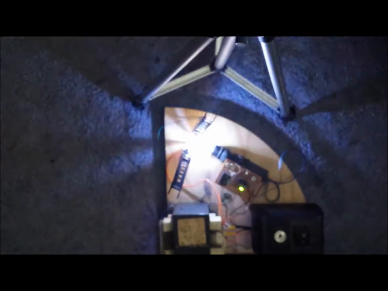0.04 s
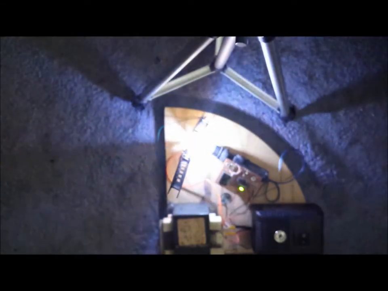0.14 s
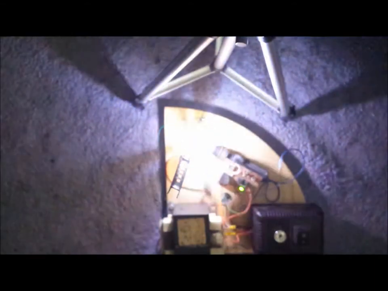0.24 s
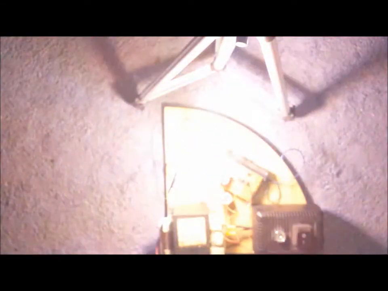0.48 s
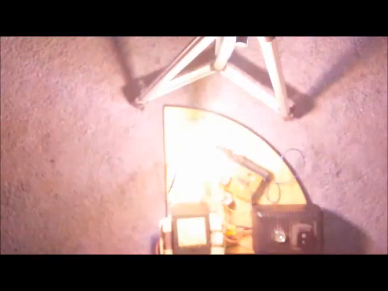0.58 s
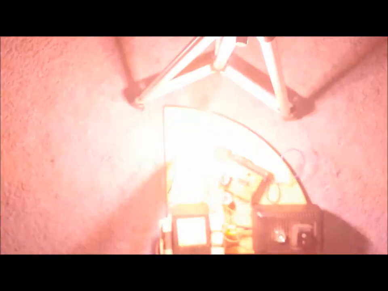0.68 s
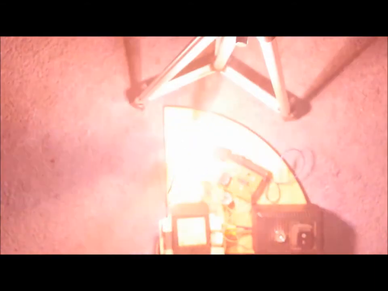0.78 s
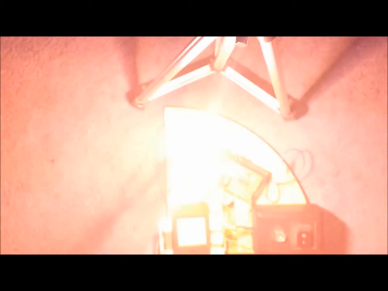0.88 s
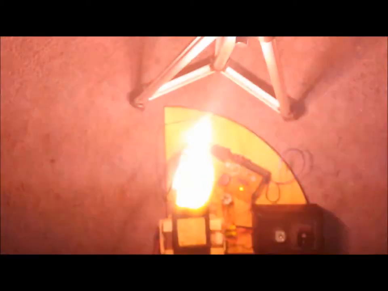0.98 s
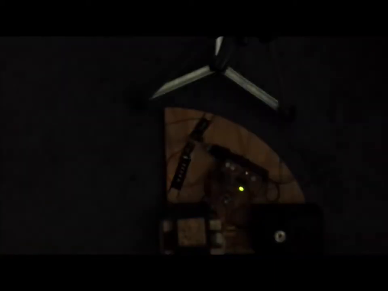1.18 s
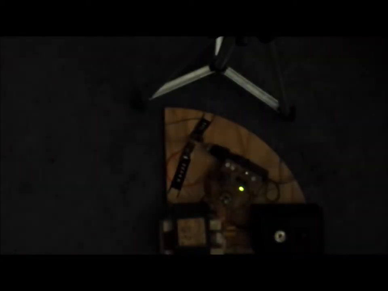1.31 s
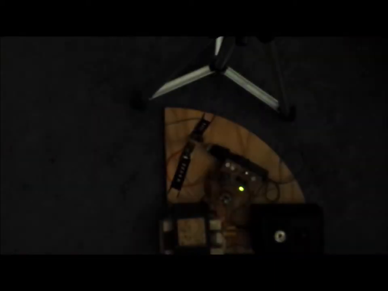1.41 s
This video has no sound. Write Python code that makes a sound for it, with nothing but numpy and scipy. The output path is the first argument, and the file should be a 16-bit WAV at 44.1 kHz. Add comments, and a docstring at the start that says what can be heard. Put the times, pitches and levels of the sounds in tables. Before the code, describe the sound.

Spitting electric arc buzz with sharp snaps grows into a deep hum, then suddenly stops.

```python
"""Electric arc in a small room

A transformer feeds an arc on the floor, restriking 100 times a second. A thin spitting buzz
flares with sharp snaps, then swells into a flame with a deep hum.
It goes out at once and leaves the faint hum of the transformer."""
import sys
import numpy as np
from scipy import signal
from scipy.fft import rfft, irfft
from scipy.io import wavfile

SR = 44100
rng = np.random.default_rng(int(sys.argv[2]) if len(sys.argv) > 2 else 0)


def to_wav(sig):
    """Store sig (one row per channel, or 1-D mono) as 16-bit WAV at the path in sys.argv[1].

    Samples outside -1..1 are clipped; the rate is SR.
    """
    pcm = np.clip(np.atleast_2d(sig), -1, 1) * 32767
    pcm = np.round(pcm).astype(np.int16)
    wavfile.write(sys.argv[1], SR, pcm.T)  # frames by channels


N = 63945
T = np.arange(N) / SR
BUZZ_HZ, FLARE_S, OUT_S = 100, .364, 1.0894
SPARK_OFFSET_S, FLAME_OFFSET_S, SPARK_WIDTH_S = .0075, .0095, .000182
HUM_FALL_DB_PER_S = 391


def amp(db):
    """Decibels to gain."""
    return 10 ** (np.asarray(db) / 20)

def unit_rms(x):
    """Scale to rms 1."""
    return x / np.sqrt(np.mean(x ** 2) + 1e-20)

def curve(table, t=T, column=1):
    """Table column, interpolated in time."""
    rows = np.array(table)
    return np.interp(t, rows[:, 0], rows[:, column])

def spectrum(table, hz):
    """Table interpolated in log frequency."""
    freq_hz, value = np.transpose(table)
    return np.interp(np.log(hz + 1), np.log(freq_hz + 1), value)

def colour(x, tone):
    """Filter by a spectrum in dB."""
    gain = amp(spectrum(tone, np.fft.rfftfreq(2 * N, 1 / SR)))
    return irfft(rfft(x, 2 * N) * gain)[..., :N]

# Left-right likeness: freq_hz, correlation
STEREO_CORRELATION = [(150, 0.91), (1500, 0.07), (4000, 0.24), (12000, 0.24)]

def noise(tone, grain_db=0):
    """Stereo noise, alike in the bass; grain makes it crackle."""
    white = rng.standard_normal((2, N))
    grain = amp(grain_db * np.minimum(rng.exponential(1, N), 6))
    left, other = rfft(white * grain)
    shared = spectrum(STEREO_CORRELATION, np.fft.rfftfreq(N, 1 / SR))
    right = shared * left + np.sqrt(1 - shared ** 2) * other
    return unit_rms(colour(irfft(np.array([left, right]), N), tone))

def drift(rate_hz):
    """Slow random wander, rms 1."""
    lowpass = np.exp(-(np.fft.rfftfreq(N, 1 / SR) / rate_hz) ** 2)
    return unit_rms(irfft(rfft(rng.standard_normal(N)) * lowpass, N))

def pulse(at_s, level_db, half_width_s, order=3):
    """Pressure pulse of one strike; higher order flattens the top."""
    return amp(level_db) * np.exp(-np.minimum(abs(T - at_s) / half_width_s, 10) ** order / 2)

def burst(start_s, level_db, decay_s, rise_s=.0003):
    """Envelope: linear rise, exponential decay."""
    return amp(level_db) * np.clip((T - start_s) / rise_s, 0, 1) * np.exp(-abs(T - start_s) / decay_s)

def ring_out(db_per_s):
    """Decay once the arc is out."""
    return amp(-db_per_s * np.maximum(T - OUT_S, 0))

def unrest(t):
    """Restlessness of the arc; drops as the flame settles."""
    return np.interp(t, (.68, .88), [1, .3])

def radiate(x, cutoff_hz):
    """A small source radiates little bass."""
    return signal.sosfilt(signal.butter(1, cutoff_hz, "high", fs=SR, output="sos"), x)


# Spark restrikes: time_s, level_db
SPARK_LEVEL = [(0, -30.5), (.12, -31), (.22, -28), (.33, -30), (.38, -29), (.68, -36), (.8, -44)]

def spark(jitter_s=.000015, scatter_db=1.1):
    """Thin buzz: a square, regular pulse each half cycle."""
    out = np.zeros(N)
    for at_s in np.arange(SPARK_OFFSET_S, OUT_S, 1 / BUZZ_HZ):
        late, size = rng.standard_normal(2)
        level_db = curve(SPARK_LEVEL, at_s) + scatter_db * size
        out += pulse(at_s + jitter_s * late, level_db, SPARK_WIDTH_S, order=6)
    return out

# Flame restrikes: time_s, level_db, half_width_s
FLAME_SHAPE = [(.36, -35, 0.00018), (.44, -22, 0.00018), (.5, -15.5, 0.00019), (.57, -33, 0.0012),
               (.66, -16, 0.00037), (.71, -24.5, 0.00017), (.77, -32.5, 0.00044), (.85, -26.5, 0.00023),
               (.98, -41, 0.00013), (1.08, -29, 0.00029)]
# Loud snaps: time_s, level_db, half_width_s
SNAP_PULSES = [(.3694, -7.5, .00005), (.3990, -14, .00012), (.4194, -11, .00009), (.4693, -20, .00011),
               (.5095, -15.5, .00016), (.5298, -9, .00015), (.5397, -15, .00015), (.5601, -9.5, .00019),
               (.5894, -17.5, .00011), (.6291, -14.5, .0002), (.6796, -20.5, .00014), (.7392, -17.5, .0002),
               (.8099, -22, .00021), (.8198, -25, .00019), (.9197, -23.5, .00019), (.9295, -22.5, .00021),
               (.9395, -23.5, .00019), (1.0003, -27.5, .00016)]

def flame(jitter_s=.00022, scatter_db=1.8):
    """Rounder, unsteady restrikes; a snap replaces the nearest one."""
    out = sum(pulse(*snap) for snap in SNAP_PULSES)
    for at_s in np.arange(FLAME_OFFSET_S, OUT_S, 1 / BUZZ_HZ):
        late, size = rng.standard_normal(2)
        snap_gap_s = min(abs(at_s - snap[0]) for snap in SNAP_PULSES)
        if at_s > FLARE_S and snap_gap_s > .5 / BUZZ_HZ:
            level_db = curve(FLAME_SHAPE, at_s) + scatter_db * size
            half_width_s = curve(FLAME_SHAPE, at_s, column=2)
            out += pulse(at_s + jitter_s * unrest(at_s) * late, level_db, half_width_s)
    return out

def electrode_ring(x, pitch_hz=2350, width_hz=500, until_s=.43):
    """The first snaps, on bare metal, ring the electrodes."""
    resonance = signal.iirpeak(pitch_hz, pitch_hz / width_hz, fs=SR)
    return x + .8 * signal.lfilter(*resonance, x * (T < until_s))

# Nearby surfaces: delay_s, left_gain, right_gain
REFLECTIONS = [(.00032, -0.22, -0.4), (.0015, .19, 0.23), (.0029, -0.42, 0.08), (.0062, 0.23, 0.25)]

def strikes():
    """Spark and flame pulses with their early reflections."""
    direct = radiate(spark(), cutoff_hz=805) - radiate(electrode_ring(flame()), cutoff_hz=607)
    return direct + sum(np.array([[left], [right]]) * np.interp(T - delay_s, T, direct, left=0)
                        for delay_s, left, right in REFLECTIONS)

# Flame hum: time_s, fundamental_db, overtones_db
HUM_LEVEL = [(0, -53, -60), (.2, -45, -66), (.35, -40.5, -57), (.48, -33, -37), (.56, -26.5, -31),
             (.66, -26.5, -31.5), (.77, -28.5, -36.5), (.92, -26, -34), (1, -24, -39.5), (1.06, -21.5, -33),
             (1.09, -22, -43)]
# Hum overtones: harmonic, gain_db
HUM_OVERTONES = [(2, -3), (3, -11), (4, -12), (5, -11.5), (6, -14), (7, -40)]
# Sinking resonance: time_s, centre_hz
HUM_RESONANCE = [(.8, 605), (.9, 551), (1, 503), (1.05, 410)]

def flame_hum(offset_s=.0083, left_lag_s=.000083, half_width_hz=61, waver_rad=.92):
    """The flame swells and collapses each half cycle; a resonance emerges as it settles."""
    phase = 2 * np.pi * BUZZ_HZ * (T - offset_s)
    lag = 2 * np.pi * BUZZ_HZ * left_lag_s * np.array([[.5], [-.5]])
    out = amp(curve(HUM_LEVEL)) * np.sin(phase) * np.ones((2, 1))
    for harmonic, gain_db in HUM_OVERTONES:
        detuning = (harmonic * BUZZ_HZ - curve(HUM_RESONANCE)) / half_width_hz
        lift_db = 18 * (1 - unrest(T)) / (1 + detuning ** 2)
        level_db = curve(HUM_LEVEL, column=2) + gain_db + lift_db + drift(5.1)
        waver = waver_rad * unrest(T) * drift(4.4)
        out += amp(level_db) * np.sin(harmonic * (phase - lag) + waver) * ring_out(db_per_s=456)
    return -np.sqrt(2) * out * ring_out(HUM_FALL_DB_PER_S)

def puffs(rise_s=.00064, decay_s=.0011, steady=.32, scatter_db=1.66):
    """Envelope: a puff after each strike, evening out as the flame settles."""
    offset_s = np.where(T < FLARE_S, SPARK_OFFSET_S, FLAME_OFFSET_S - SPARK_WIDTH_S)
    age_s = (T - offset_s) % (1 / BUZZ_HZ)
    shape = unit_rms(steady + np.minimum(age_s / rise_s, 1) * np.exp(-age_s / decay_s))
    uneven = shape * amp(scatter_db * drift(38))
    return (1 + unrest(T) * (uneven - 1)) * (T < OUT_S)

def sprays(gain_db=-23, loss_db_per_doubling=9):
    """Envelope of crackle thrown by snaps; wider snaps throw less."""
    out = np.zeros(N)
    for start_s, level_db, half_width_s in SNAP_PULSES:
        loss_db = loss_db_per_doubling * np.log2(half_width_s / .0001)
        out += burst(start_s, level_db + gain_db - loss_db, decay_s=.0016)
    return out

# Fine hiss: time_s, level_db
HISS_LEVEL = [(0, -45), (.1, -50), (.19, -47), (.24, -41.5), (.34, -59), (.4, -49), (.47, -46), (.59, -45),
              (.7, -48), (.78, -44), (.9, -49.5), (.99, -43.5), (1.085, -48.5)]
# Hiss spectrum: freq_hz, gain_db
HISS_SPECTRUM = [(100, 5.5), (500, 0.5), (1600, 5), (2650, -7), (3500, -2), (6000, -1.5), (8200, 1),
                 (11000, -1.5), (14500, -4.5)]
# Coarse crackle of the flaring electrodes: time_s, level_db
CRACKLE_LEVEL = [(.16, -49.5), (.3, -45), (.368, -46), (.382, -36), (.42, -35), (.46, -43), (.56, -45),
                 (.68, -45.5), (.78, -86)]
# Crackle spectrum: freq_hz, gain_db
CRACKLE_SPECTRUM = [(200, -37), (1000, -0.5), (2200, 2.5), (4000, 2.5), (7000, -2.5), (10000, -7),
                    (14500, -19)]

def sizzle(grain_db=1.5):
    """Hiss and crackle follow each strike; snaps add crackle."""
    puffing = puffs()
    hiss = amp(curve(HISS_LEVEL)) * puffing * noise(HISS_SPECTRUM, grain_db)
    crackle = (amp(curve(CRACKLE_LEVEL)) * puffing + sprays()) * noise(CRACKLE_SPECTRUM, grain_db)
    return hiss + crackle

# Arc spits: start_s, level_db, decay_s, centre_hz
SPIT_BURSTS = [(.1172, -25.5, .002, 4100), (.2215, -31.5, .007, 7800), (.3483, -29, .002, 2400),
               (.358, -25.5, .0025, 2500), (.659, -33, .004, 7500), (1.088, -44, .009, 5500)]

def spits(skirt_db=-12):
    """The arc spits short hisses, each around its own pitch."""
    out = np.zeros((2, N))
    for start_s, level_db, decay_s, hz in SPIT_BURSTS:
        band = [(hz / 4, 2 * skirt_db), (hz / 2, skirt_db), (hz, 0), (2 * hz, skirt_db)]
        out += burst(start_s, level_db, decay_s) * noise(band)
    return out

# Flame turbulence: time_s, level_db
ROAR_LEVEL = [(0, -66.5), (.33, -48), (.4, -42), (.5, -38), (.57, -34), (.63, -37.5), (.73, -36),
              (.78, -46), (1.05, -43.5), (1.085, -37.5)]
# Turbulence spectrum: freq_hz, gain_db
ROAR_SPECTRUM = [(25, -38), (70, -11), (150, -6), (350, 1.5), (750, 0.5), (1050, -10), (2500, -14),
                 (8000, -35)]

def roar():
    """Hot air churns, throbbing with the current."""
    throb = 1 + .64 * np.cos(2 * np.pi * BUZZ_HZ * T)
    return amp(curve(ROAR_LEVEL)) * throb * (T < OUT_S) * noise(ROAR_SPECTRUM)

def mains_tones(table):
    """Mains harmonics, each wavering slightly in level."""
    return np.sqrt(2) * sum(amp(level_db + drift(.75)) * np.cos(2 * np.pi * hz * (T - SPARK_OFFSET_S))
                            for hz, level_db in table)

# Idle core: pitch_hz, level_db
IDLE_TONES = [(100, -63), (200, -66), (500, -65), (600, -76), (700, -70), (800, -71.5), (900, -82),
              (1400, -80.5)]
# Loaded core: pitch_hz, level_db
LOAD_TONES = [(500, -54.5), (700, -59), (800, -58), (900, -61.5)]
# Load on the core: time_s, gain_db
LOAD_GAIN = [(0, -10), (.15, -8), (.3, 9.5), (.45, 1), (.7, -23)]

def transformer():
    """The core hums throughout and rings louder under load."""
    idle = mains_tones(IDLE_TONES)
    loaded = mains_tones(LOAD_TONES) * amp(curve(LOAD_GAIN))
    return idle + loaded * ring_out(HUM_FALL_DB_PER_S)

# Room decay: freq_hz, t60_s
ROOM_DECAY = [(1500, 0.33), (14000, 0.28)]

def room(x):
    """Short diffuse tail; treble dies sooner."""
    hz, t, bands = signal.stft(noise([(60, -6), (300, 1), (900, 0)]), SR, nperseg=256)
    decay = amp(-60 * t / spectrum(ROOM_DECAY, hz)[:, None])
    tail = signal.istft(bands * decay, SR, nperseg=256)[1][:, :N] * (T > .003)
    return signal.fftconvolve(x, tail / np.linalg.norm(tail[0]), axes=1)[:, :N]

def scene():
    """The arc and its room over the transformer."""
    pulses = strikes()
    hiss = sizzle() + spits() + roar()
    reverb = room(amp(-4) * pulses + amp(-4.5) * hiss)
    return pulses + hiss + reverb + flame_hum() + transformer()

# Left microphone: freq_hz, gain_db
LEFT_RESPONSE = [(3000, -3), (5200, 2), (6300, 7.5), (7500, 0), (9000, -7), (11000, -13.5), (14000, -48)]
# Right microphone: freq_hz, gain_db
RIGHT_RESPONSE = [(3000, -3), (6000, 1.5), (8200, 2), (14000, -0.5)]
# Noise floor: freq_hz, gain_db
FLOOR_SPECTRUM = [(25, -18), (150, -9), (300, -13), (700, -18), (2000, -29.5), (14500, -34.5)]

def record(dry):
    """Two unlike microphones, faint noise floor, 14.5 kHz band limit."""
    mics = np.array([colour(dry[0], LEFT_RESPONSE), colour(dry[1], RIGHT_RESPONSE)])
    floor = amp(-63) * noise(FLOOR_SPECTRUM)
    lowpass = signal.firwin(511, 14500, window=("kaiser", 9), fs=SR)
    return signal.oaconvolve(mics + floor, lowpass[None], "same")


dry = scene()
out = record(dry)
to_wav(out)
```